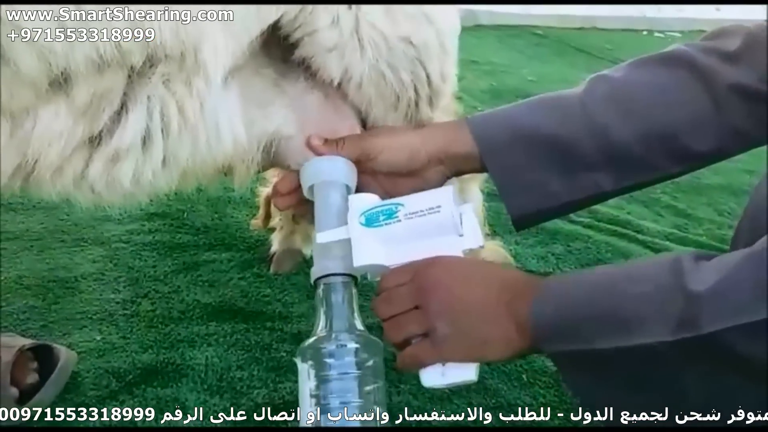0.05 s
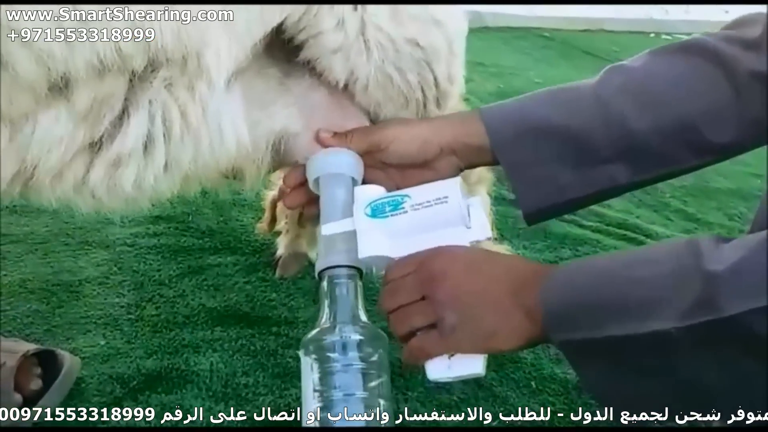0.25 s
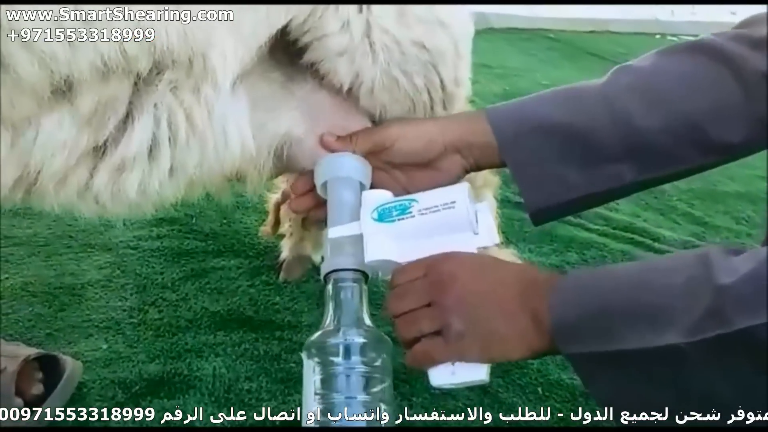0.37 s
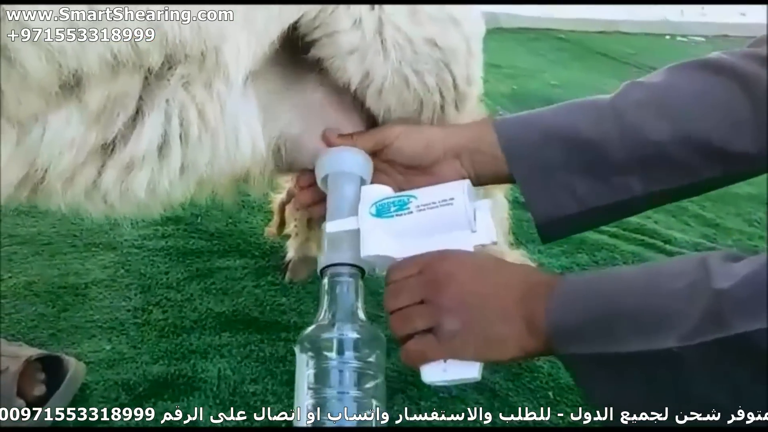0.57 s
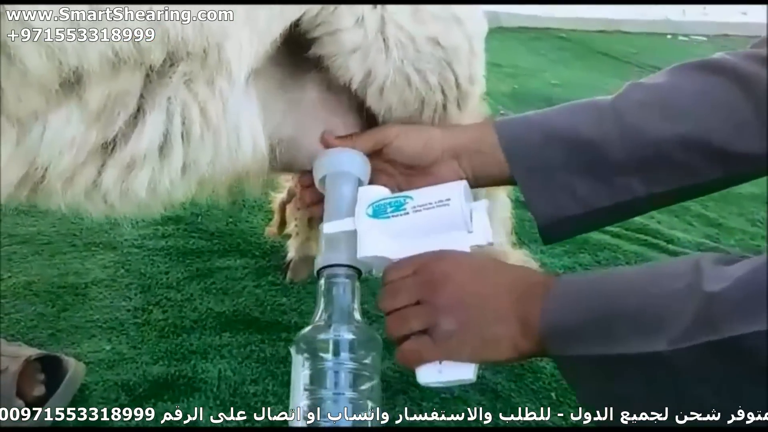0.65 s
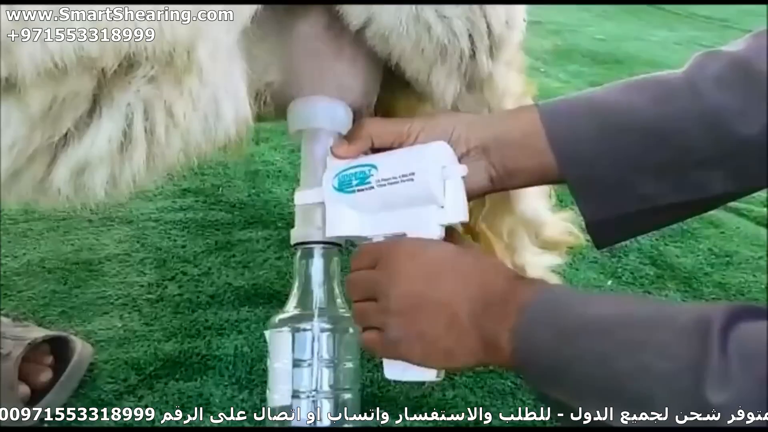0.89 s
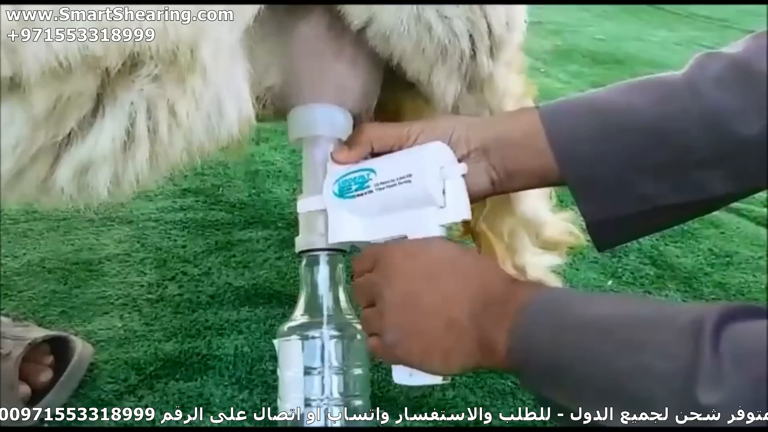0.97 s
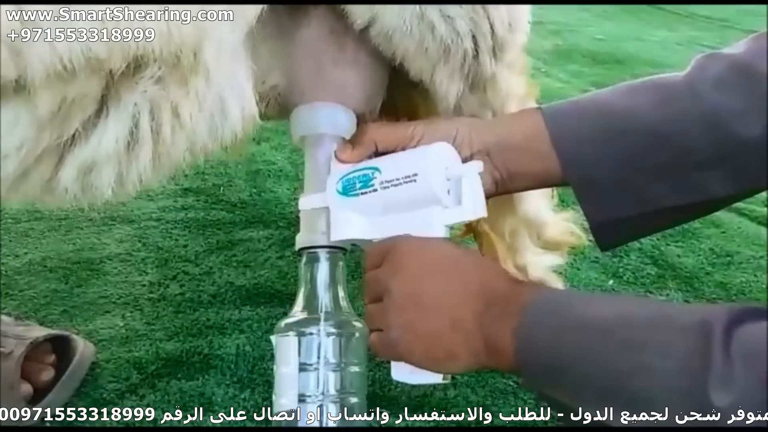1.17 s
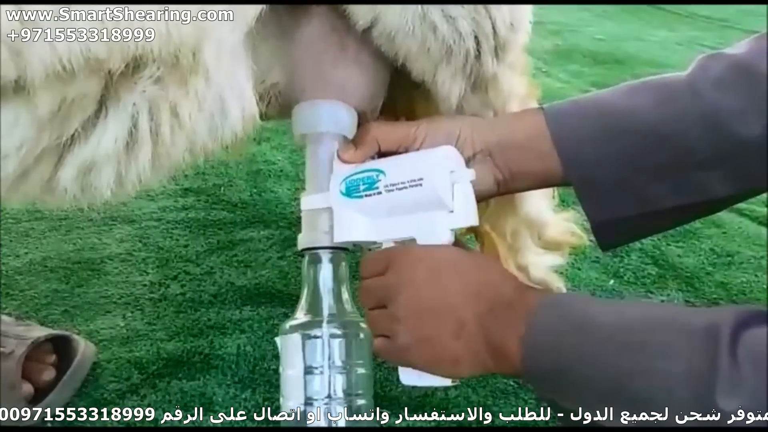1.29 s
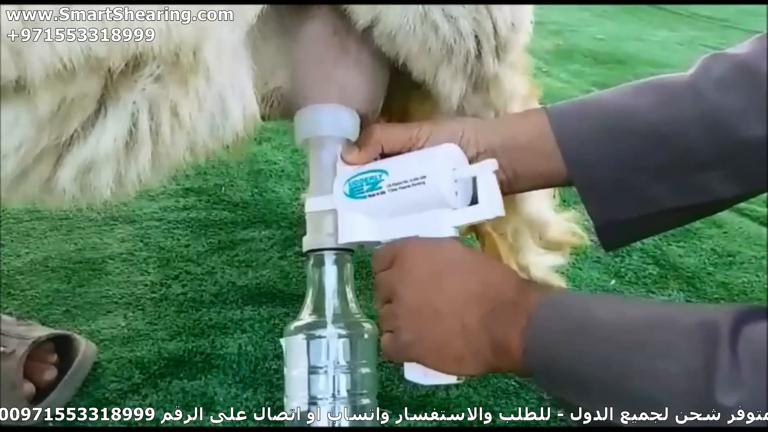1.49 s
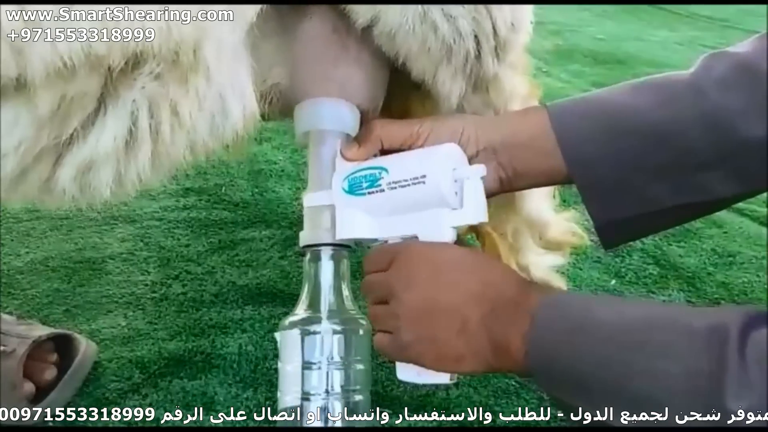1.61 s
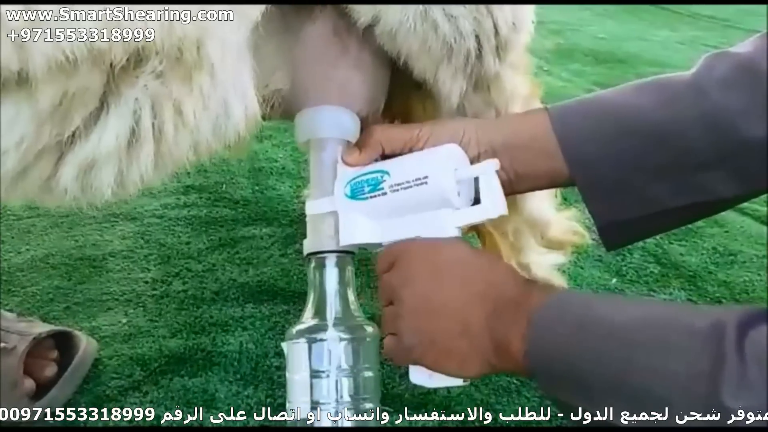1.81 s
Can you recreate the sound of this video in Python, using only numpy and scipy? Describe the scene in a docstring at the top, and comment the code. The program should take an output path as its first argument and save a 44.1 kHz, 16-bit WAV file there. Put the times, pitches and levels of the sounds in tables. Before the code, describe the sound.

Three close plastic clacks from a hand milker, each followed by a squeaky hiss and click.

```python
"""A plastic hand milker is pumped three times in a quiet farm pen, close to a stereo microphone.
First, air buffets the microphone's two openings (ports) and a sleeve rustles as the milker is set down.
Then each stroke knocks, scrapes and clacks shut; the bottle rings hollow and the piston bounces back.
Last in each stroke, air hisses through a squeaking valve, the trigger clicks back and the grip slides."""
import sys
import numpy as np
from scipy import signal
from scipy.fft import rfft, irfft
from scipy.io import wavfile
from scipy.ndimage import uniform_filter1d

SR = 44100
rng = np.random.default_rng(int(sys.argv[2]) if len(sys.argv) > 2 else 0)


def store_pcm(level_fs):
    """Save levels as 16-bit WAV."""
    pcm = np.round(np.clip(level_fs, -1, 1) * 32767).astype(np.int16)
    wavfile.write(sys.argv[1], SR, np.atleast_2d(pcm).T)


N = 81585
TIME = np.arange(N) / SR

# how alike a nearby sound is on the left and right: f/Hz, likeness (1 = the same)
NEAR_LIKENESS = [(100, 1), (1200, 0.72), (2500, 0.43), (5000, 0.45), (16000, 0)]
# tone of the crack in a gentle blow on plastic: f/Hz, level/dB
SOFT_CRACK = [(100, -10), (500, 8), (1400, 3), (2300, -11), (4000, -13.5), (8000, -20.5), (16000, -28)]


def amp(db):
    """Turns decibels into a factor to multiply by."""
    return 10 ** (np.asarray(db) / 20)


def unit(x):
    """Scales a signal to an average strength (rms) of 1."""
    return x / np.sqrt(np.mean(x ** 2) + 1e-20)


def at_hz(points, hz):
    """Reads between the rows of a frequency table, on a logarithmic scale."""
    f, value = np.transpose(points)
    return np.interp(np.log(hz + 1), np.log(f + 1), value)


def level(points):
    """A volume curve for the whole scene, drawn through (t/s, level/dB) points."""
    return amp(np.interp(TIME, *np.transpose(points)))


def swell(peak_s, rise_s, fall_s, squareness=2):
    """A bell-shaped volume curve; more squareness flattens its top."""
    width_s = np.where(TIME < peak_s, rise_s, fall_s)
    return np.exp(-abs((TIME - peak_s) / width_s) ** squareness / 2)


def wobble(smoothing, size=N):
    """A random wavering, slower the more samples it is smoothed over."""
    return unit(uniform_filter1d(rng.standard_normal(size), size=smoothing))


def pan(db):
    """Left and right gains for a balance in dB; positive leans left."""
    return unit(amp(np.array([[db], [-db]]) / 2))


def add(mix, s, sound):
    """Mixes a stereo sound in, starting at s seconds."""
    part = mix[:, max(round(s * SR), 0):][:, :sound.shape[1]]
    part += sound[:, :part.shape[1]]


def noise(tone, likeness=None, balance=None, size=N):
    """Stereo noise shaped by tables of tone, left-right likeness and balance."""
    hz = np.fft.rfftfreq(size, 1 / SR)
    left, other = rfft(rng.standard_normal((2, size)))
    shared = np.clip(at_hz(likeness, hz), -1, 1) if likeness else 0
    right = shared * left + np.sqrt(1 - shared ** 2) * other
    spectrum = np.array([left, right]) * amp(at_hz(tone, hz))
    if balance:
        spectrum *= amp(np.outer([1, -1], at_hz(balance, hz)) / 2)
    return unit(irfft(spectrum, size))


def pen():
    """The quiet pen rumbles faintly."""
    # tone of the rumble: f/Hz, level/dB
    tone = [(20, -18), (60, -7), (105, 3.5), (170, -3.5), (260, -12), (450, -10), (800, -21), (1600, -23),
            (3000, -30), (6000, -37.5), (10000, -47.5), (16000, -38)]
    # its volume: t/s, level/dB
    volume = [(0, -59.5), (.3, -51), (.72, -55.5), (.86, -55), (1.3, -53), (1.68, -56), (1.78, -55.5),
              (1.85, -58.5)]
    # how alike its two sides are: f/Hz, likeness
    likeness = [(30, 0.47), (110, 1), (400, 0.88), (1500, 0.025), (5000, 0), (16000, 0)]
    return noise(tone, likeness) * level(volume)


def microphone_hiss():
    """The microphone makes a steady hiss of its own."""
    # tone of the hiss: f/Hz, level/dB
    tone = [(100, 17), (1000, -13), (1800, -7), (4000, 5.5), (8000, 7.5), (16000, 3)]
    return amp(-73) * noise(tone)


def pen_echo(sound, t60=0.15, echo_db=-28.5, top_hz=2500, size=12000):
    """Ground and walls send back a faint, dull echo that fades by 60 dB in t60 seconds."""
    t = np.arange(size) / SR
    dull = signal.lfilter(*signal.butter(1, top_hz, fs=SR), rng.standard_normal((2, size)))
    tail = dull * amp(-60 * t / t60) * (t > .004)
    return amp(echo_db) * signal.fftconvolve(sound, tail / np.linalg.norm(tail[0]), axes=1)[:, :N]


def wind(size=2048):
    """Swirling air rumbles at each port on its own, with a few hard slaps."""
    # tone of the wind: f/Hz, level/dB
    tone = [(20, -22), (45, 1), (80, 8), (160, 1), (300, -14.5), (500, -18), (900, -38), (2000, -85),
            (16000, -100)]
    # wind at the left port: t/s, level/dB
    left = [(0, -79), (.12, -66), (.2, -59), (.265, -50), (.305, -16), (.345, -25.5), (.375, -31),
            (.44, -46.5), (.53, -39), (.62, -44), (.72, -75)]
    # wind at the right port: t/s, level/dB
    right = [(0, -61), (.11, -57), (.138, -40.5), (.185, -44.5), (.22, -18.5), (.26, -20.5), (.33, -19.5),
             (.385, -40), (.45, -49.5), (.51, -36), (.61, -46), (.72, -65)]
    # faint swirls later on: peak t/s, level/dB, width/s
    swirls = [(1.03, -51, 0.014), (1.39, -54, 0.0083), (1.69, -51.5, 0.043)]
    # tone of the swirls: f/Hz, level/dB
    swirl_tone = [(20, 7), (50, 13), (100, 9.5), (180, -26), (400, -37), (2000, -80)]
    # air slaps a port: t/s, level/dB, low edge f/Hz, high edge f/Hz, balance/dB
    slaps = [(.137, -30.5, 129, 169, -25.5), (0.21, -11, 663, 800, -47.5), (0.2113, -8, 110, 220, -58),
             (0.2368, -21.5, 600, 850, -40.5), (0.2855, -8.5, 160, 270, -35), (0.292, -15, 150, 220, -0.5),
             (0.3081, -18.5, 130, 280, 23), (0.323, -14.5, 150, 340, 9), (0.331, -18, 120, 170, -23),
             (0.3433, -9.5, 87, 400, 34), (0.3575, -21.5, 130, 260, -13), (0.386, -21.5, 97, 216, 34),
             (0.41, -28, 84, 180, 32)]
    out = noise(tone) * np.array([level(left), level(right)])
    out += noise(swirl_tone) * sum(amp(db) * swell(s, width, width) for s, db, width in swirls)
    pressure_step = -np.ones(size)
    for s, db, low_hz, high_hz, side_db in slaps:
        slap = signal.sosfilt(signal.butter(2, low_hz, "highpass", fs=SR, output="sos"), pressure_step)
        slap = signal.sosfilt(signal.butter(4, high_hz, fs=SR, output="sos"), slap)
        start_s = s - 1 / (2 * high_hz)  # early, as the slap takes time to build
        add(out, start_s, amp(db) * pan(side_db) * slap / abs(slap).max())
    return out


def sleeve(early_s=0.42, late_s=.56, grain_db=-1.0):
    """Cloth slides in one grainy rustle that grows brighter."""
    # volume of the rustle: t/s, level/dB
    volume = [(.28, -72), (.335, -60), (.38, -47), (.44, -41), (.46, -43.5), (.54, -42.5), (.655, -47),
              (.71, -56.5), (.76, -85)]
    # its tone at first: f/Hz, level/dB
    early_tone = [(350, -45), (600, -16), (1410, 1.5), (1850, -2), (2180, -1.5), (3210, -7.5), (3630, -5),
                  (4650, -17.5), (5870, -17.5), (16000, -35)]
    # its tone at the end: f/Hz, level/dB
    late_tone = [(350, -47), (600, -14.5), (931, -6.5), (1080, -12), (1290, -4.5), (1660, -6), (2540, -12),
                 (3340, -4), (4280, -12), (15100, -29.5), (16000, -26)]
    # how alike its two sides are: f/Hz, likeness
    likeness = [(100, .2), (640, 1), (1410, 0.1), (3100, -0.65), (6800, 0.3), (16000, -0.5)]
    # how far it leans left: f/Hz, balance/dB
    balance = [(100, -20), (700, 0.5), (1300, 2), (2400, 6.5), (4400, 1), (8000, 3.5), (15000, -4)]
    blend = np.clip((TIME - early_s) / (late_s - early_s), 0, 1)
    rub = np.sqrt(1 - blend) * noise(early_tone, likeness, balance)
    rub += np.sqrt(blend) * noise(late_tone, likeness, balance)
    return rub * level(volume) * amp(grain_db * wobble(smoothing=90))


def grip():
    """The grip slides softly after each stroke."""
    # slides: peak t/s, level/dB, rise/s, fall/s
    slides = [(1.069, -54, .01, 0.017), (1.443, -54.5, 0.0067, 0.02), (1.814, -54.5, 0.01, 0.027)]
    tone = [(100, 11), (1200, 4), (3000, -4.5), (7000, -10), (16000, -18)]  # f/Hz, level/dB
    volume = sum(amp(db) * swell(s, rise, fall) for s, db, rise, fall in slides)
    return noise(tone, NEAR_LIKENESS) * volume


def squeak(peak_s, waver=0.0117, right_lag_s=.000035):
    """The valve whistles briefly, then jumps to a fainter, higher note."""
    # path of the whistle: t/s from the peak of the airflow, f/Hz, level/dB
    path = [(-.026, 6150, -34), (-.016, 6200, -12.5), (-.009, 6270, 1), (-.003, 6300, -13),
            (.003, 6650, -14.5), (0.021, 6750, -20), (.034, 6950, -41)]
    s, hz, db = np.transpose(path)
    pitch = np.interp(TIME - peak_s, s, hz) * (1 + waver * wobble(smoothing=40))
    volume = amp(np.interp(TIME - peak_s, s, db, left=-120, right=-120))
    cycles = np.cumsum(pitch) / SR - pitch * np.array([[0], [right_lag_s]])
    return np.sqrt(2) * volume * np.sin(2 * np.pi * cycles)


def valve():
    """Air hisses in through the squeaking valve as the trigger is let go."""
    # gulps of air: peak t/s, hiss level/dB, rise/s, fall/s, squeak level/dB
    gulps = [(0.947, -47, 0.021, 0.018, -45.5), (1.31, -47, .02, 0.025, -40.5),
             (1.688, -48.5, 0.024, 0.019, -42.5)]
    # tone of the rushing air: f/Hz, level/dB
    tone = [(100, 4), (500, -9.5), (1000, 3.5), (1700, 5), (2600, -2.5), (3500, -3.5), (4700, -9),
            (6500, -6), (9000, -12), (13000, -16.5), (16000, -17)]
    flow = sum(amp(db) * swell(s, rise, fall, squareness=2.05) for s, db, rise, fall, _ in gulps)
    air = noise(tone, NEAR_LIKENESS) * flow
    whistle = sum(amp(db) * squeak(s) for s, _, _, _, db in gulps)
    return air + whistle * pan(db=-7)


def bottle(start_hz=339, sag_hz_per_s=482, db=-38.5, t60=0.26, rise_s=0.044, waver=0.032, size=5000):
    """The air in the bottle rings hollow, sagging unevenly in pitch."""
    t = np.arange(size) / SR
    pitch = (start_hz - sag_hz_per_s * t) * (1 + waver * wobble(smoothing=400, size=size))
    volume = np.minimum(t / rise_s, 1) * amp(db - 60 * t / t60)
    return volume * np.sin(2 * np.pi * np.cumsum(pitch) / SR) * pan(db=0)


def scrape(db=-43.5, length_s=0.059, sag_db=-13, size=4096):
    """The piston rubs along its barrel between knock and clack."""
    # tone of the rubbing: f/Hz, level/dB
    tone = [(100, -39), (500, -13), (850, -5.5), (1130, -6.5), (1400, -1.5), (1800, -18.5), (2600, -28.5),
            (4200, -31), (7000, -36), (16000, -44)]
    progress = np.arange(size) / SR / length_s
    shape = np.interp(progress, [0, .1, 1, 1.15], [0, 1, 1, 0])
    return noise(tone, NEAR_LIKENESS, size=size) * shape * amp(db + sag_db * progress)


def hit(notes, crack_tone, crack_db, crack_t60, attack_s, treble_db=0, size=4096):
    """Struck plastic gives a noisy crack and short ringing notes, each fading 60 dB in its t60."""
    # how the two ports colour the blow: f/Hz, balance/dB
    balance = [(100, 2), (400, -4.5), (800, -.5), (1300, .5), (2300, -3), (3700, -7), (5000, -3.5),
               (8000, 1.5), (16000, -11)]
    crack_rise_s, right_lag_s, treble_hz = 0.0013, .00004, 2160
    t = np.arange(size) / SR
    age = np.maximum(t - np.array([[0], [right_lag_s]]), 0)  # the ring reaches the right port later
    ring = np.zeros((2, size))
    for k, (hz, db, t60) in enumerate(notes):
        boost_db = treble_db * hz ** 2 / (hz ** 2 + treble_hz ** 2)
        wave = (-1) ** k * np.sin(2 * np.pi * hz * age)  # every other note starts downward
        ring += wave * amp(db + boost_db - 60 * age / t60) * pan(at_hz(balance, hz))
    crack = noise(crack_tone, NEAR_LIKENESS, balance, size=size)
    crack *= amp(crack_db + treble_db - 60 * t / crack_t60) * (1 - np.exp(-t / crack_rise_s))
    fade_in = 1 - np.exp(-(t / attack_s) ** 2)
    return (ring + crack) * fade_in


def rebounds():
    """The piston bounces back from its stop with a soft tap."""
    # bounces: t/s, level/dB
    bounces = [(.853, -22.5), (1.224, -26.5), (1.601, -39)]
    # ringing of the plastic: f/Hz, level/dB, t60/s
    notes = [(323, -3.5, 0.0077), (607, -24, 0.019), (1080, -7, 0.025), (1430, -17, 0.019)]
    out = np.zeros((2, N))
    for s, db in bounces:
        tap = hit(notes, SOFT_CRACK, crack_db=-14, crack_t60=0.023, attack_s=0.00064)
        add(out, s, amp(db) * tap * pan(db=2.5))
    return out


def knocks():
    """The trigger takes up its slack with a knock, and the piston starts to scrape."""
    # squeezes: t/s, level/dB
    squeezes = [(0.7709, -23), (1.1373, -23), (1.5146, -24.5)]
    # ringing of the plastic: f/Hz, level/dB, t60/s
    notes = [(212, -6, 0.0089), (554, 4, 0.0087), (1163, -2, .02), (1464, -8.5, 0.011), (1910, -22, 0.015)]
    out = np.zeros((2, N))
    for s, db in squeezes:
        knock = hit(notes, SOFT_CRACK, crack_db=-10.5, crack_t60=0.017, attack_s=0.0011)
        add(out, s, amp(db) * knock * pan(db=2) + scrape())
    return out


def return_clicks():
    """The trigger clicks back into place."""
    # clicks: t/s, level/dB
    clicks = [(0.9742, -20), (.994, -52), (1.3438, -22.5), (1.363, -44), (1.728, -41.5), (1.7336, -40.5)]
    # ringing of the plastic: f/Hz, level/dB, t60/s
    notes = [(125, -32, 0.019), (470, -14, 0.042), (947, -4.5, 0.0082), (1585, -1, 0.014),
             (1854, -8, 0.012), (2214, -4, 0.02), (2916, -20, 0.03), (3490, -7.5, 0.0088),
             (5280, -11.5, 0.0077)]
    # tone of the crack: f/Hz, level/dB
    crack = [(100, 3), (800, 1), (2000, 4.5), (3500, -4.5), (6000, -13), (9000, -24), (16000, -25)]
    out = np.zeros((2, N))
    for s, db in clicks:
        click = hit(notes, crack, crack_db=-5, crack_t60=.016, attack_s=0.00062)
        add(out, s, amp(db) * click * pan(db=5))
    return out


def clacks(latch_delay_s=0.001425):
    """The piston hits its stop, the latch catches just after, and the bottle rings."""
    # blows on the stop: t/s, level/dB, treble boost/dB, latch boost/dB
    blows = [(0.8124, -10, -3.5, 1), (1.1814, -11, 3, 0.5), (1.5606, -11, -1.5, -4.5)]
    # ringing of the stop: f/Hz, level/dB, t60/s
    stop_notes = [(880, 3.5, 0.0027), (367, -9, 0.014), (845, -14, 0.026), (1192, -8.5, 0.014),
                  (1400, -9, 0.015), (533, -21.5, 0.035), (3136, -25, 0.013), (4890, -25, 0.015),
                  (5550, -25.5, 0.021)]
    # ringing of the latch: f/Hz, level/dB, t60/s
    latch_notes = [(1800, -7.5, 0.0092), (2053, -13, 0.024), (2531, -22, 0.027), (3658, -15.5, 0.018),
                   (4044, -24, 0.021), (5047, -24, 0.025), (6540, -39, 0.031), (9100, -56, 0.0088)]
    # tone of both cracks: f/Hz, level/dB
    crack = [(100, -40), (350, -2.5), (1200, -3.5), (2200, 1), (4000, -7), (6000, -16), (8500, -17),
             (12000, -29), (16000, -39)]
    out = np.zeros((2, N))
    for s, db, treble, latch_db in blows:
        stop = hit(stop_notes, crack, crack_db=-10, crack_t60=.02, attack_s=0.00074, treble_db=treble)
        add(out, s, amp(db) * stop * pan(db=3))
        add(out, s, bottle())
        latch = hit(latch_notes, crack, crack_db=-8, crack_t60=.0077, attack_s=.00022, treble_db=treble)
        add(out, s + latch_delay_s, amp(db + latch_db) * latch * pan(db=6.5))
    return out


def scene():
    """The milker and its echo, the sleeve and the wind over the quiet pen."""
    milker = knocks() + clacks() + rebounds() + return_clicks() + valve() + grip()
    background = pen() + microphone_hiss()
    return background + milker + pen_echo(milker) + sleeve() + wind()


def record(dry, cutoff_hz=16100):
    """The recorder cuts off the very highest treble."""
    lowpass = signal.firwin(511, cutoff_hz, window=("kaiser", 9), fs=SR)
    return signal.oaconvolve(dry, lowpass[None], "same")


dry = scene()
out = record(dry)
store_pcm(out)
```